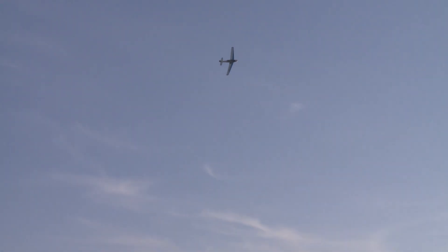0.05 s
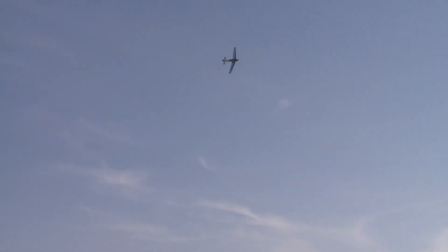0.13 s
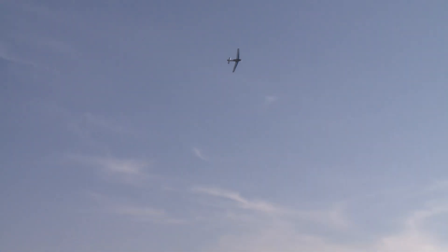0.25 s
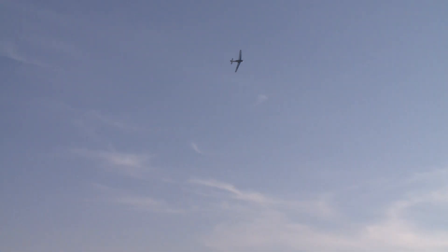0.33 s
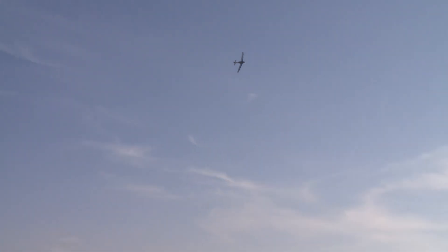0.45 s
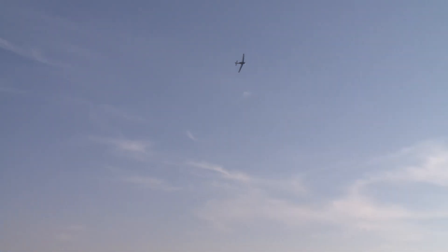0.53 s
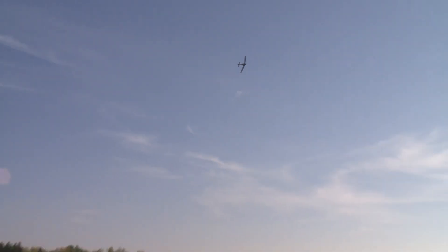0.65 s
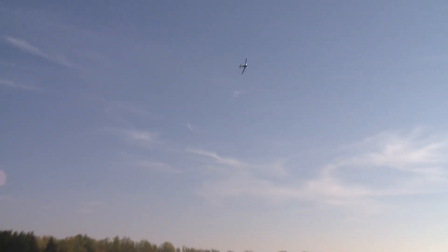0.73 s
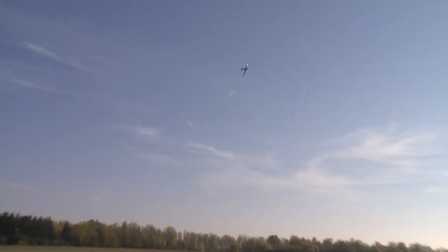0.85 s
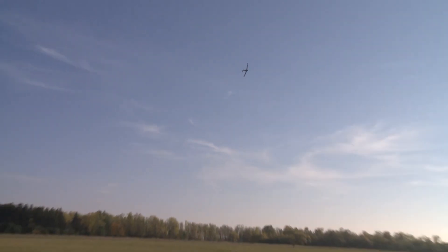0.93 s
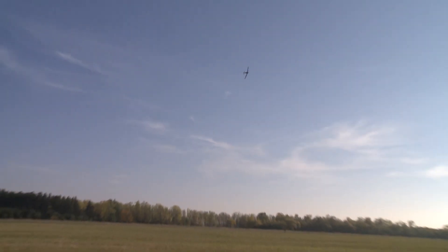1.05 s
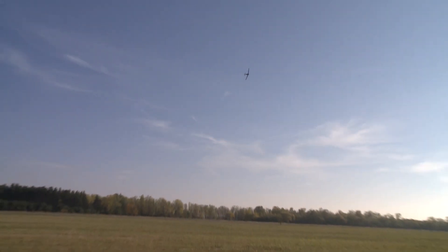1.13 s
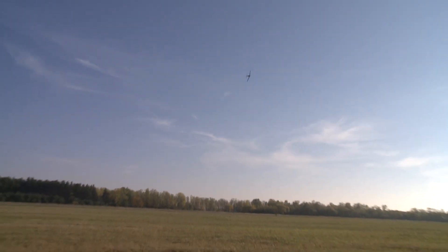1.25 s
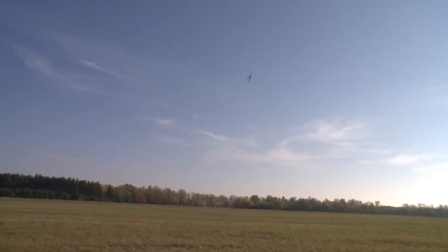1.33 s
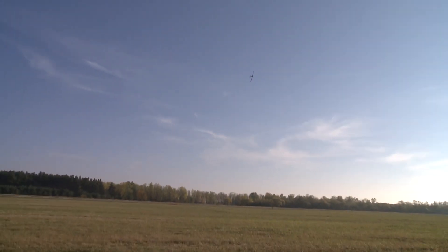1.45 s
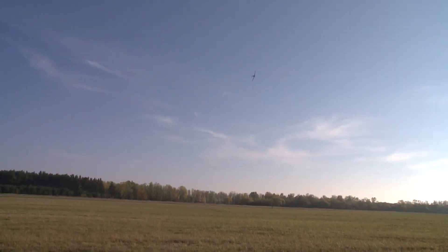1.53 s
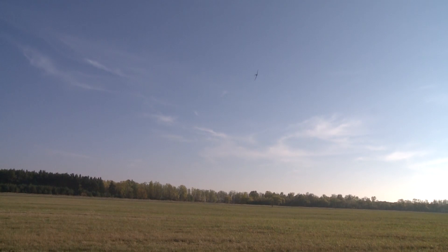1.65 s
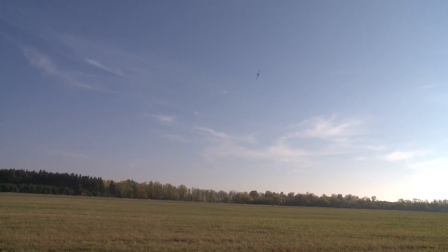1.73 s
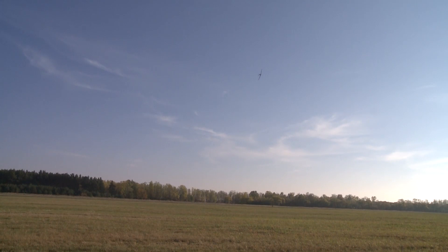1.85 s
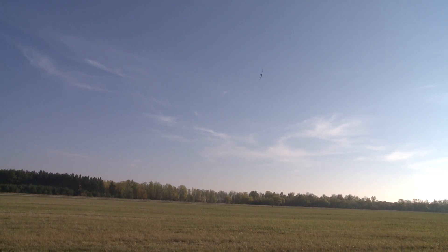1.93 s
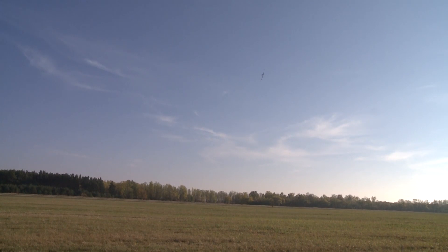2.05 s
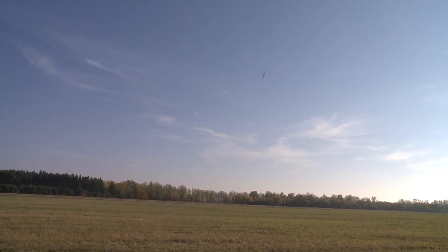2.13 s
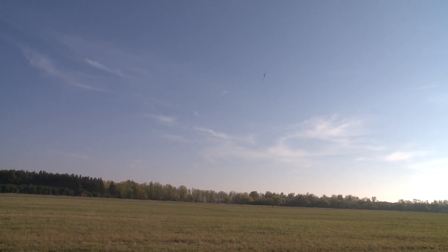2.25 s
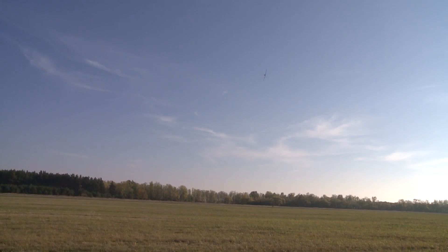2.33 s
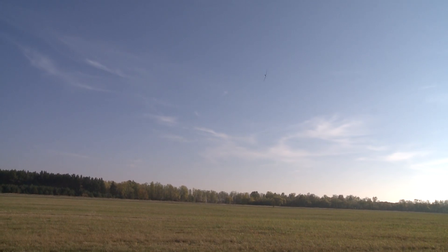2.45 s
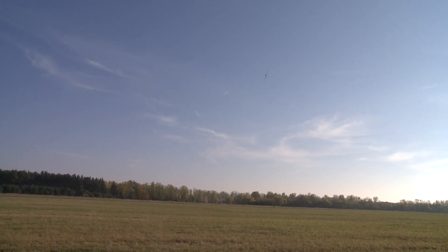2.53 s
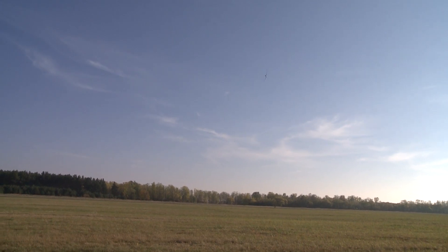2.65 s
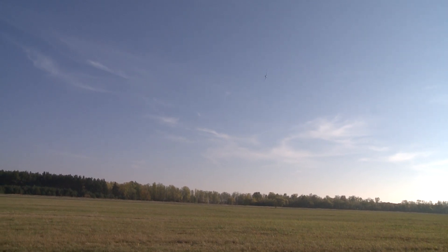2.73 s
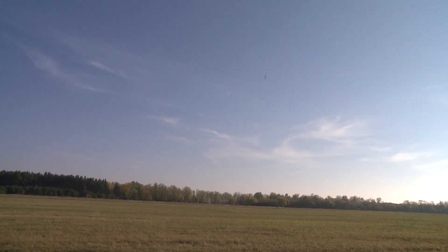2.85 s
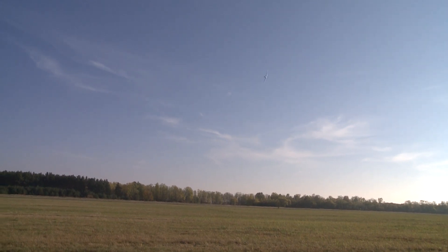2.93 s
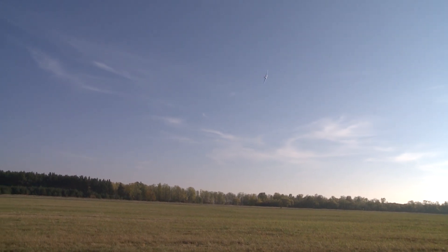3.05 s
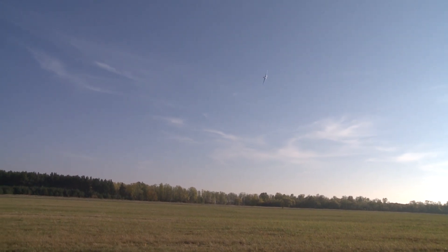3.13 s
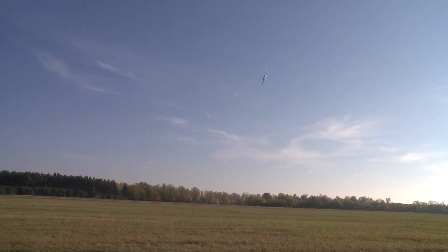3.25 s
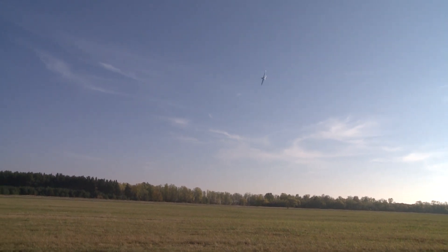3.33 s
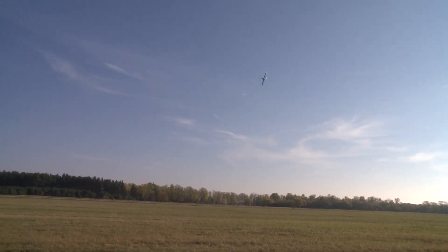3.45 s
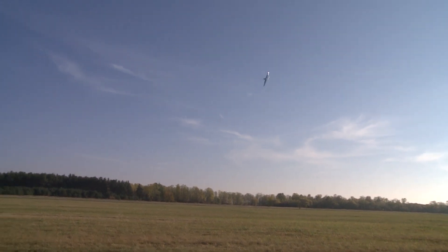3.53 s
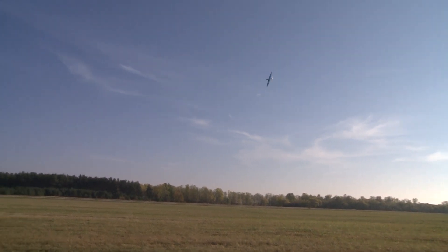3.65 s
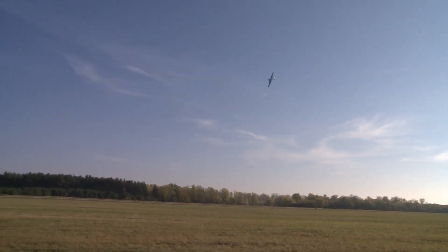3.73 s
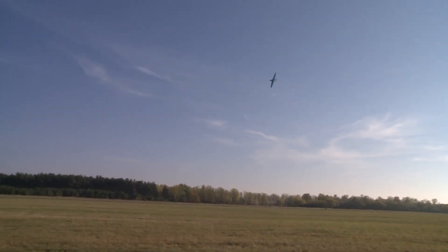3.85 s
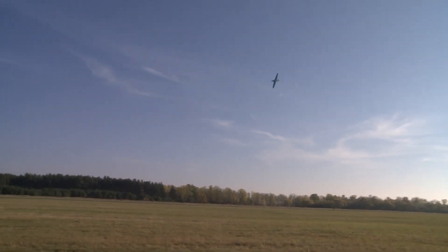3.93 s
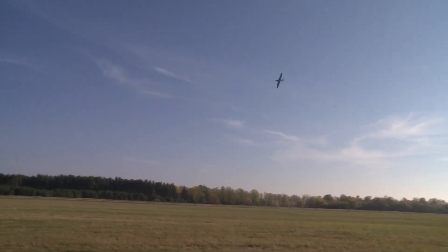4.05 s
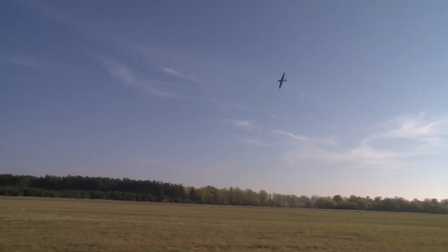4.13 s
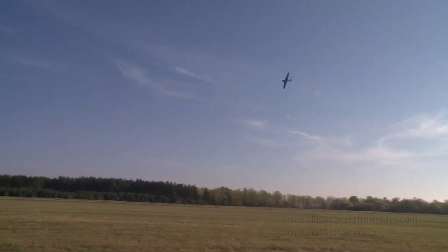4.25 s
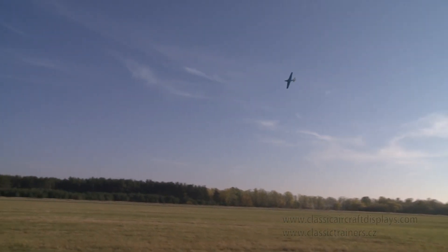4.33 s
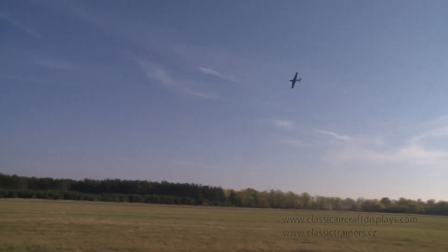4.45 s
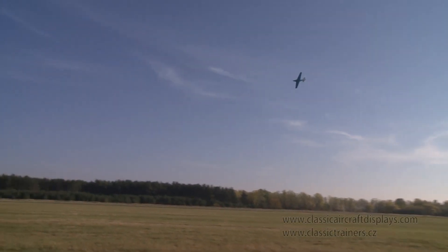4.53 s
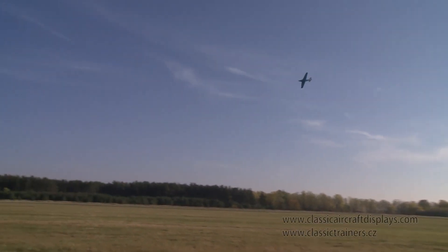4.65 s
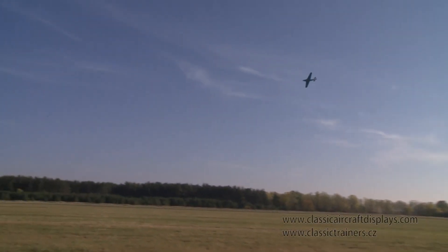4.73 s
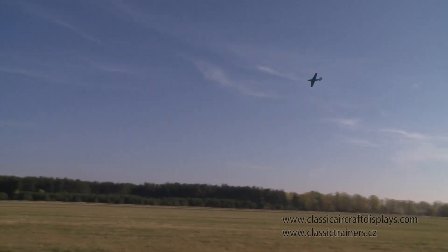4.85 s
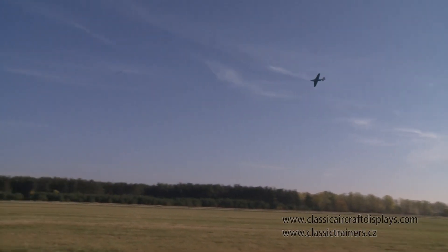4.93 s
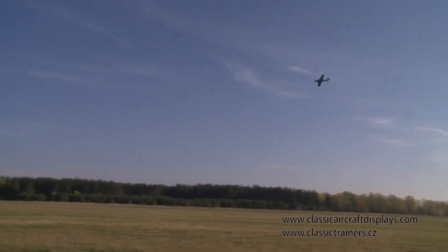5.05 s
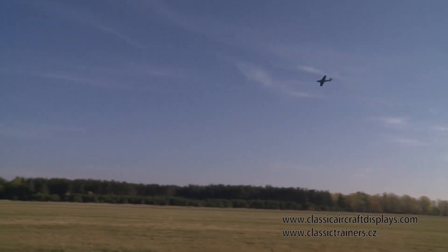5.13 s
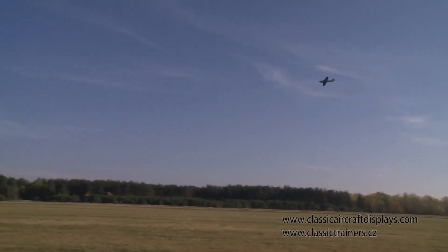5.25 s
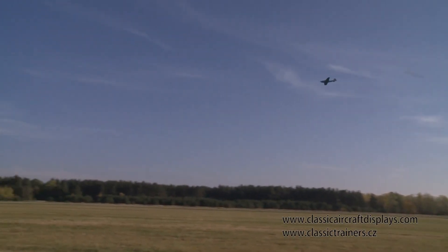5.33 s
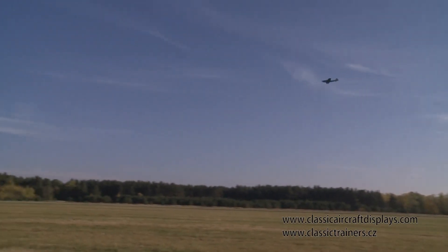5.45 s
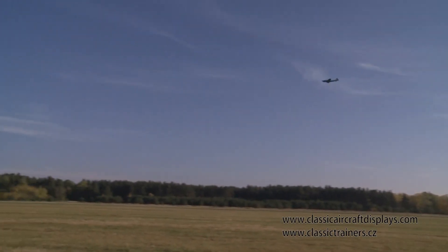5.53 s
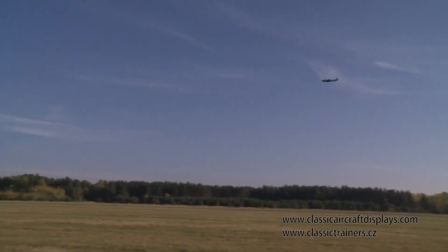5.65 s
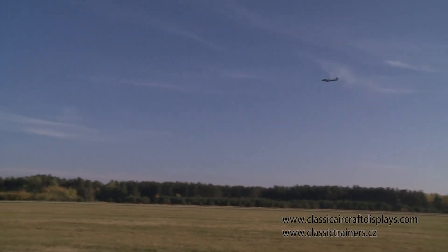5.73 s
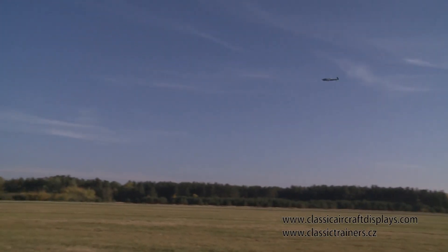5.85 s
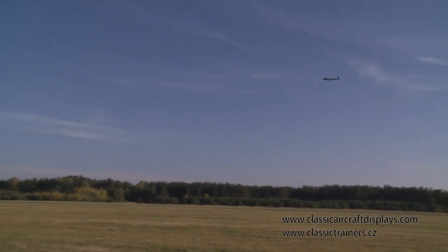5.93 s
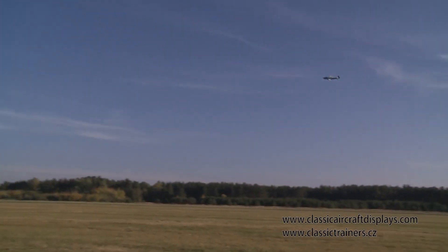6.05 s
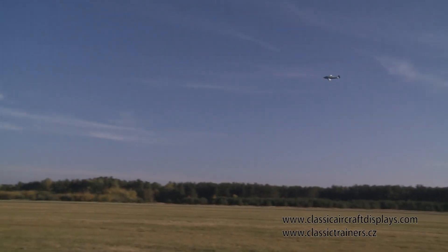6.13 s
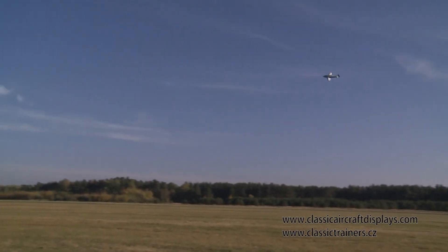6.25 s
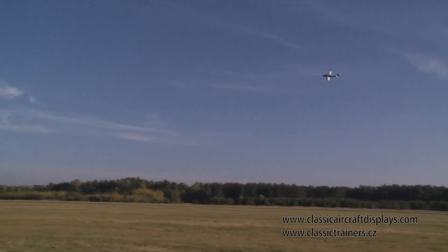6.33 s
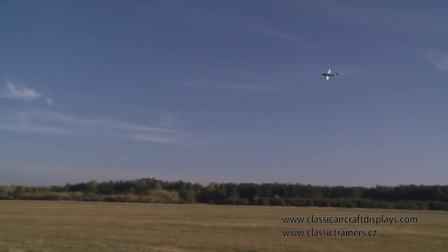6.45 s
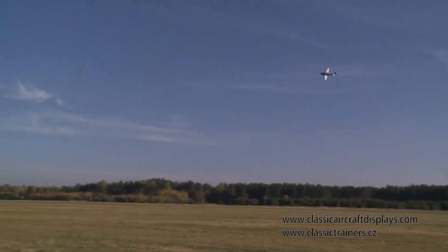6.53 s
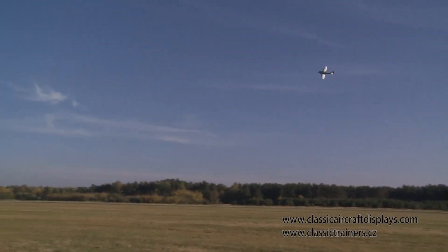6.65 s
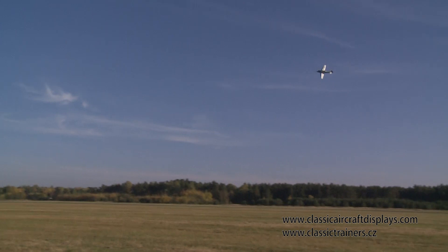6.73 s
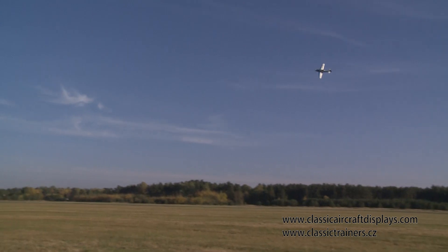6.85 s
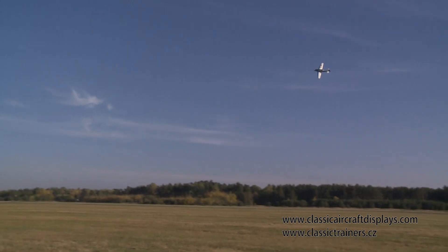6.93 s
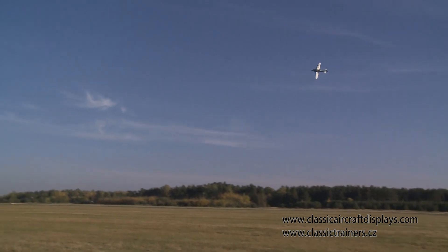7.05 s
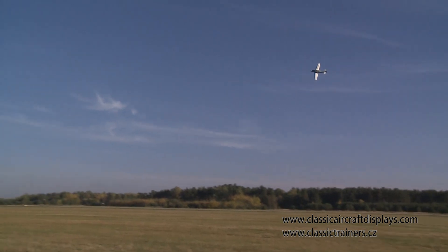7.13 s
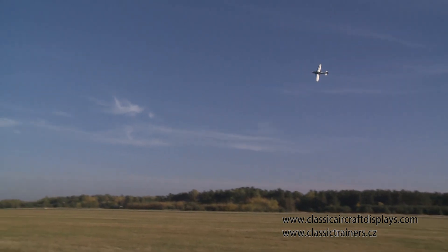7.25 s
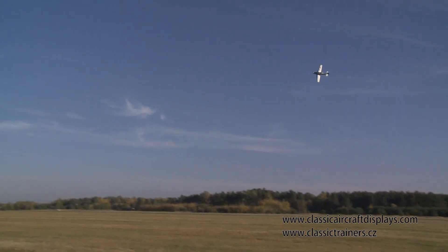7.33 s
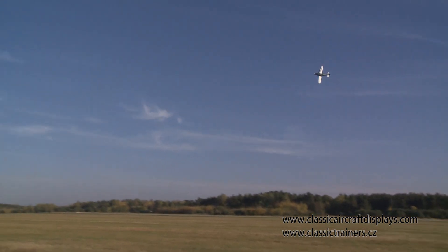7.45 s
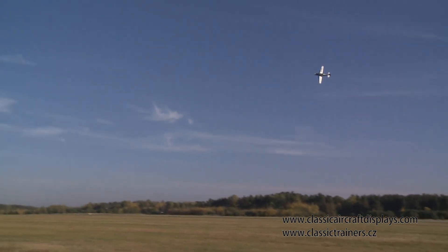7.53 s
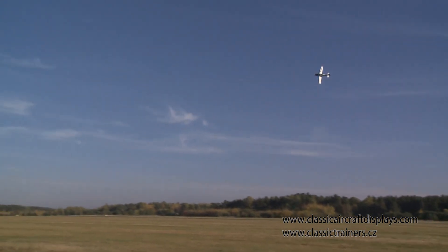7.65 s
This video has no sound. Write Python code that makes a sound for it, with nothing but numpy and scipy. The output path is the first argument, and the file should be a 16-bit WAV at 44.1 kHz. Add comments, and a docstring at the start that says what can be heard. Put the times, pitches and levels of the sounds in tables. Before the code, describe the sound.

Piston propeller plane drones over an open field, pitch rising then sliding down as it swings past with rasping, crackling exhaust; small motor whirs at first.

```python
"""Propeller plane over an airfield

A piston-engine plane turns above an open airfield and swings past, over breeze and far countryside.
Shaft-locked sines make the propeller and firing drone; each firing adds a rasping burst of pulses and noise.
An echo off the grass combs the body of the bursts, and a few firings crack louder than the rest.
A lens zoom motor whirs at first; the sources reach the right channel only, the left holds faint hiss."""
import sys
import numpy as np
from scipy import signal
from scipy.fft import rfft, irfft, next_fast_len
from scipy.io import wavfile
from scipy.ndimage import uniform_filter1d, map_coordinates

SR = 44100
rng = np.random.default_rng(int(sys.argv[2]) if len(sys.argv) > 2 else 0)


def bounce(signal):
    """Save signal as a 16-bit WAV file at the path given by the first command-line argument."""
    frames = np.transpose(np.atleast_2d(signal))
    limited = np.clip(frames, -1, 1)
    pcm = np.round(limited * 32767).astype(np.int16)
    wavfile.write(sys.argv[1], SR, pcm)


N = 339570
TIME = np.arange(N) / SR
# Source levels are mix levels, ahead of the microphone gain in scene().
FLANK_TURN_S = (3.77, 5.8)  # the plane swings from end-on to broadside


def from_db(db):
    """Decibels to amplitude."""
    return 10 ** (np.asarray(db) / 20)


def rms_one(x):
    """Scale a sound to rms 1."""
    return x / np.sqrt(np.mean(x ** 2) + 1e-20)


def in_time(rows):
    """Each column of a curve table at every sample."""
    s, *columns = np.transpose(rows)
    return [np.interp(TIME, s, c) for c in columns]


def humps(rows):
    """Sum of bell-shaped rises or dips; the half length reaches down to 1/e."""
    return sum(db * np.exp(-((TIME - s) / half_s) ** 2) for s, half_s, db in rows)


def drift(rate_hz):
    """Slow random wander of spread 1: noise through two equal low-pass poles at the given rate."""
    step = 40  # samples between drawn points
    pole = np.exp(-2 * step * np.pi * rate_hz / SR)
    noise = rng.standard_normal(N // step + 2002)
    slow = signal.lfilter([1], [1, -2 * pole, pole * pole], noise)[2000:]  # drop the filter's start-up
    return np.interp(np.arange(N) / step, np.arange(len(slow)), rms_one(slow))


def coloured(x, spectrum):
    """Shape a sound by (frequency [Hz], relative level [dB]) points; rms 1."""
    size = next_fast_len(N + SR // 4)
    hz, db = np.transpose(spectrum)
    bins_hz = np.maximum(np.arange(size // 2 + 1) * SR / size, 1)
    gain = from_db(np.interp(np.log(bins_hz), np.log(hz), db))
    return rms_one(irfft(rfft(x, size) * gain, size)[:N])


def band(x, low_hz, high_hz, order=4):
    """One band of a sound, without phase shift so that neighbours join smoothly; rms 1."""
    edges_hz = [low_hz, min(high_hz, .45 * SR)]
    return rms_one(signal.sosfiltfilt(signal.butter(order, edges_hz, "band", fs=SR, output="sos"), x))


def blend(a, b, share):
    """Two sounds mixed by power, the first taking the given share."""
    share = np.clip(share, 0, 1)
    return np.sqrt(share) * rms_one(a) + np.sqrt(1 - share) * rms_one(b)


def evened(x):
    """Hold the rms near 1 over a sliding quarter of a second."""
    return x / np.sqrt(uniform_filter1d(x ** 2, size=SR // 4) + 1e-12)


def flank():
    """How far the plane has turned its side to the listener, 0-1."""
    return np.interp(TIME, FLANK_TURN_S, [0, 1])


def channel_hiss():
    """Steady white noise, independent in each channel: faint on the left, a little stronger on the right."""
    return from_db([[-84.5], [-81]]) * rng.standard_normal((2, N))


def open_field():
    """Breeze and far countryside: steady noise weighted to the low end."""
    # colour of the field: (frequency [Hz], relative level [dB])
    field_colour = [(20, 5), (42, 10), (70, 8), (120, 8), (250, -5.5), (600, -25.5), (1500, -3.5),
                    (4000, -83)]
    return from_db(-56.0) * coloured(rng.standard_normal(N), field_colour)


def zoom_motor(whine_hz, step_hz, swing_hz):
    """A small lens motor: its whine swoops and pulses with the gear's turning, over a hiss of gears."""
    # motor running down to silence: (time [s], level [dB])
    motor_level = [(0, -74), (.95, -74.5), (1.2, -79), (1.42, -88), (1.6, -120)]
    # hiss of the gears: (frequency [Hz], relative level [dB])
    gear_colour = [(1500, -27), (2500, 6), (3300, 3), (4000, 0), (4600, -11), (5500, -10), (6500, -25.5)]
    level_db, = in_time(motor_level)
    gear = 2 * np.pi * step_hz * TIME + 0.16 * drift(6)
    swoop = np.sin(gear / 2) + np.sin(gear) + np.sin(3 * gear / 2) + np.sin(2 * gear)
    pitch_hz = whine_hz + swing_hz * swoop + 130 * drift(250)
    pulse = (1 + .5 * np.cos(gear)) * from_db(1.5 * drift(150))
    whine = np.sin(2 * np.pi * np.cumsum(pitch_hz) / SR) * pulse
    gears = from_db(-2) * coloured(rng.standard_normal(N), gear_colour)  # dB against the whine
    return from_db(level_db) * (band(whine, 3700, 4270, order=3) + gears)


def propeller_wash(growl_db):
    """Turbulent air behind the propeller: low noise whose level follows the growl."""
    # colour of the wash: (frequency [Hz], relative level [dB])
    wash_colour = [(30, -32), (90, 23), (170, 10), (300, 19.5), (420, 19), (600, -11), (900, -40.5)]
    return from_db(growl_db - 12.5) * coloured(rng.standard_normal(N), wash_colour)


def buzz_level():
    """Blade buzz in dB: it sinks as the plane turns away and returns as it swings past."""
    start_db, end_on_db, passing_db = -53.5, -68, -45.5
    sinks_s, returns_s = (.8, 1.8), (4.85, 5.4)
    buzz_db = np.interp(TIME, [*sinks_s, *returns_s], [start_db, end_on_db, end_on_db, passing_db])
    dulling_db = 0.1 * (buzz_db - passing_db)  # the upper overtones lose extra dB per dB of buzz
    return buzz_db, dulling_db


def propeller(turns):
    """Four blades geared to half the crank speed pass twice a crank turn, each with a slap and a swish."""
    # fundamental of the blade passes: (time [s], level [dB])
    blade_tone = [(0, -47.5), (1.651, -48), (2.2, -44.5), (2.9, -46.5), (3.95, -41), (4.899, -45.5),
                  (5.25, -40.5), (7.7, -35)]
    # slaps creep ahead of the firings as the plane rolls: (time [s], lead [crank turns])
    blade_lead = [(0, .01), (4.2, .01), (5.0, .045), (5.4, .085), (6.0, .135), (6.62, .208), (7.1, .29),
                  (7.7, .34)]
    # buzz: (multiple of the blade-pass rate [ratio], level against the buzz before dulling [dB])
    overtones = [(2, -1), (3, -6), (4, -1), (5, -1), (6, -8), (7, -11.5), (8, -11), (9, -10), (10, -9.5),
                 (11, -13), (12, -22), (13, -24)]
    # air dragged along by each blade: (frequency [Hz], relative level [dB])
    swish_colour = [(150, -29), (300, 4), (520, -0.5), (680, -2), (900, 1.5), (1200, -13), (2500, -44.5)]
    tone_db, = in_time(blade_tone)
    lead, = in_time(blade_lead)
    buzz_db, dulling_db = buzz_level()
    passes = 2 * np.pi * 2 * (turns + lead) + 0.025 * drift(3.5)
    buzz = 0
    for k, db in overtones:
        level_db = db + dulling_db * (k > 5) + 0.87 * drift(5.6)
        buzz = buzz + from_db(level_db) * np.cos(k * passes)
    swish_pulse = np.exp(8 * np.cos(passes))  # 8 sets the sharpness
    swish = from_db(-8.5) * coloured(rng.standard_normal(N) * swish_pulse, swish_colour)
    tone = np.sqrt(2) * from_db(tone_db + .3 * drift(5.6)) * np.cos(passes)
    return tone + from_db(buzz_db) * (np.sqrt(2) * buzz + swish)


def partial(turns, multiple, flutter_db, wander):
    """A sine of rms near 1 locked to a shaft; restless air shakes its level [dB] and phase [rad]."""
    phase = 2 * np.pi * multiple * turns + wander * drift(3.5)
    return np.sqrt(2) * np.sin(phase) * from_db(flutter_db * drift(5.1))


def engine_drone(turns, growl_db):
    """A bank fires three times a turn; unequal cylinders add lines whose balance shifts as the plane turns."""
    # firing tone: (time [s], level [dB])
    firing_tone = [(0, -41.5), (1.05, -39), (1.699, -43), (2.3, -40.5), (3.15, -40), (4.501, -32.5),
                   (6.1, -30.5), (6.4, -33), (6.7, -33), (7.3, -37.5), (7.7, -37.5)]
    # the octave fades and comes forward as the plane turns: (time [s], half length [s], change [dB])
    octave_fades = [(1.65, 0.56, -8.5), (2.65, 0.53, 2.5), (5.5, .35, -4)]
    # lines from unequal cylinders, multiples rounded to the nearest half below:
    # (multiple of crank speed [ratio], relative level end-on [dB], relative level broadside [dB])
    lope_lines = [(1, -19, -20), (1.5, -14.5, -19.5), (2.5, -19, -15.5), (3.5, -15.5, -10),
                  (4.5, -6.5, -13.5), (5, -14.5, -16), (5.5, -9, -15.5), (6.5, -9, -10), (7, -11.5, -14),
                  (7.5, -4.5, -5), (8, -8.5, -15), (8.5, -9.5, -13.5), (9, -10.5, -5.5), (9.5, -21.5, -17),
                  (10.5, -12, -14.5), (11.5, -20, -13), (12.5, -28, -19), (14.5, -18.5, -28.5),
                  (15, -15, -20), (16, -15.5, -21.5), (16.4, -17, -19), (17.5, -15, -20.5),
                  (18.5, -15, -24.5), (25.5, -16.5, -19.5)]
    tone_db, = in_time(firing_tone)
    # the octave rises 1.44 dB per dB of growl
    octave_db = -41 + 1.44 * (growl_db + 39.5) + humps(octave_fades)
    firings, side = 3 * turns, flank()
    tone = from_db(tone_db) * partial(firings, 1, flutter_db=0.5, wander=0.026)
    octave = from_db(octave_db) * partial(firings, 2, flutter_db=0.5, wander=0.12)
    lope = 0
    for k, end_db, side_db in lope_lines:
        line_turns = turns + 2 * rng.random()  # random starting phase
        line = partial(line_turns, round(2 * k) / 2, flutter_db=0.8, wander=0.03 * k)
        lope = lope + from_db(end_db + side * (side_db - end_db)) * line
    return tone + octave + from_db(growl_db - 4.5) * lope


def over_grass(x):
    """The ground returns a slightly later, duller copy."""
    # echo off the grass: (time [s], lag [ms], strength [0-1])
    ground_echo = [(0, 2.08, .35), (1.2, 2.244, 0.5), (2.5, 2.4, 0.26), (4.5, 2.384, 0.26),
                   (5.0, 2.295, 0.2), (5.6, 2.23, 0.18), (6.5, 2.046, 0.2), (7.5, 2.34, 0.47)]
    lag_ms, strength = in_time(ground_echo)
    dull = signal.sosfiltfilt(signal.butter(1, 8000, fs=SR, output="sos"), x)
    return x + strength * np.interp(TIME - lag_ms / 1000, TIME, dull)


def pops():
    """Now and then a firing cracks louder than the rest: one short ring of the pipe."""
    # sharper exhaust pops: (time [s], peak level before the echo [dB])
    pop_times = [(3.2632, -28.5), (4.1025, -26), (5.3875, -25.5), (5.4182, -27), (5.4803, -21),
                 (5.7632, -23), (6.797, -27)]
    clicks = np.zeros(N)
    for s, db in pop_times:
        clicks[int(s * SR)] = from_db(db)
    pipe = signal.butter(3, [1300, 2350], "band", fs=SR, output="sos")
    ring = signal.sosfilt(pipe, signal.unit_impulse(SR // 100))
    return over_grass(np.convolve(clicks, ring / np.abs(ring).max())[:N])


def bursts(turns, uneven_db):
    """Each valve in turn opens with a blast; its gas swells quickly, then falls. Gives (blasts, gas envelope)."""
    # six cylinders of the near bank in firing order: (relative level [dB])
    cylinder_levels = [-10.5, -9.5, -9.5, -7, -10, -6.8]
    # pipes of unequal length delay the blasts: (delay [share of the firing interval])
    pipe_delay = [.03, .10, .02, .07, .13, .05]
    firings = 3 * turns + .3 + 0.008 * drift(43) + .015 * drift(2)
    which, age = np.floor(firings).astype(int), firings % 1
    cylinder = which % len(cylinder_levels)
    levels_db = np.array([db + 1.2 * drift(4) for db in cylinder_levels])  # each strength wanders
    chance_db = uneven_db * rng.standard_normal(which.max() + 1)[which]
    strength = from_db(levels_db[cylinder, np.arange(N)] + chance_db)
    arrived = age > np.array(pipe_delay)[cylinder]
    blasts = np.diff(arrived.astype(int), prepend=1) > 0
    blowdown = age / .15 * np.exp(1 - age / .15)  # peaks at 0.15 of the firing interval
    return rms_one(blasts * strength), blowdown * strength


def smeared(blasts, ms_per_octave):
    """A blast leaves its pipe as a quick upward sweep with little bass in it."""
    low_hz = 627
    size = next_fast_len(N + SR // 4)
    hz = np.arange(size // 2 + 1) * SR / size
    delay_s = ms_per_octave / 1000 * np.log2(np.maximum(hz / low_hz, 1))
    gain = 1 - 1 / (1 + (hz / low_hz) ** 8)
    phase = -2j * np.pi * np.cumsum(delay_s) * SR / size  # delay summed over frequency
    return irfft(rfft(blasts, size) * gain * np.exp(phase), size)[:N]


def gas_noise(turns, envelope, repeat_share):
    """Rushing gas: partly the same in every two-turn engine cycle, partly fresh turbulence."""
    cycle = rng.standard_normal(SR // 24)
    same = map_coordinates(cycle, [turns / 2 % 1 * len(cycle)], order=3, mode="wrap")
    share = np.clip(repeat_share, 0, 1)
    return envelope * (np.sqrt(share) * same + np.sqrt(1 - share) * rng.standard_normal(N))


def radiated(gas):
    """The pipes point sideways, so their colour changes as the plane turns its flank to the listener."""
    # firing heard far off and end-on: (frequency [Hz], relative level [dB])
    end_on_colour = [(300, 1.5), (600, -6.5), (850, -4.5), (1020, -8.5), (1200, -1.5), (1430, -7.5),
                     (1750, -3.5), (1950, -7.5), (2200, -7), (2600, -10.5), (2900, -17.5), (3200, -41),
                     (3400, -37), (3700, -45.5), (4300, -45), (4650, -52.5), (5200, -39), (6600, -49.5),
                     (7300, -54.5), (9000, -67.5), (11500, -75.5)]
    # firing heard near and broadside: (frequency [Hz], relative level [dB])
    broadside_colour = [(300, -1.5), (450, -1.5), (600, -8.5), (860, -10), (1270, -15), (1500, -9.5),
                        (1950, -9.5), (2130, -13.5), (2300, -10), (2520, -22), (2850, -22), (3450, -22.5),
                        (3620, -25), (3850, -20), (4500, -31.5), (5100, -41.5), (5450, -30.5), (6100, -27),
                        (6700, -36.5), (7900, -35), (8900, -56), (11500, -75)]
    return (1 - flank()) * coloured(gas, end_on_colour) + flank() * coloured(gas, broadside_colour)


def bright_edge(x, half_width_hz):
    """Lift or dip a narrow band whose centre wanders, by shifting it to 0 Hz, filtering and shifting back."""
    # bright edge in the rasp: (time [s], centre [Hz], lift [dB])
    rasp_edge = [(0, 2470, 3.5), (.8, 2450, 8.5), (1.28, 2315, 6.5), (1.7, 2240, 0), (2.5, 2330, 5.5),
                 (3.2, 2270, 4), (4.2, 2220, 0), (4.75, 2270, 6.5), (5.25, 2040, 0.5), (5.87, 1960, 6.5),
                 (6.2, 1990, 0.5), (6.43, 2004, 7), (6.7, 1900, -1), (7.2, 2030, 0), (7.6, 2240, 3)]
    centre_hz, lift_db = in_time(rasp_edge)
    carrier = np.exp(2j * np.pi * np.cumsum(centre_hz) / SR)
    near = signal.sosfiltfilt(signal.butter(2, half_width_hz, fs=SR, output="sos"), x / carrier)
    return x + (from_db(lift_db) - 1) * 2 * np.real(near * carrier)


def exhaust_levels():
    """Bark, rasp, crackle, sizzle and air in dB: all follow the rasp and swell and sink with restless air."""
    # rasp as the pipes turn to and from the listener, before swells: (time [s], level [dB])
    rasp_level = [(0.0, -64.5), (0.7, -65.5), (0.83, -60.5), (1.32, -56), (1.62, -62.5), (1.84, -57.5),
                  (2.97, -54.5), (3.12, -48), (3.25, -45.5), (3.9, -41.5), (4.04, -46), (4.67, -42.5),
                  (5.07, -46), (5.49, -42), (6.32, -45.5), (7.11, -48), (7.7, -47.5)]
    # brief bright swells: (time [s], half length [s], change in the sizzle [dB])
    swells = [(.34, 0.059, 10), (.86, 0.074, 10), (.95, .03, 2.5), (1.18, 0.046, 9), (1.3, 0.048, 0.5),
              (1.85, .05, 4), (2.22, 0.058, 7.5), (2.53, 0.046, 2), (4.36, 0.064, 8.5), (4.58, 0.032, 5.5),
              (4.66, 0.028, 6.5), (4.81, 0.037, 6), (5.05, 0.092, 5.5), (5.19, 0.07, 7.5), (5.3, 0.064, 6),
              (5.395, 0.06, 9.5), (5.535, 0.024, 7.5), (5.6, 0.048, 7.5), (5.8, 0.098, 2), (5.97, 0.11, 6),
              (6.14, 0.026, 7.5), (6.21, 0.077, 12), (6.33, 0.04, 2.5), (6.45, 0.075, 7.5),
              (6.57, 0.038, 4), (6.72, 0.084, 4.5), (6.82, 0.061, 4.5), (6.895, 0.032, 7.5),
              (7.16, 0.084, 7), (7.53, 0.078, 2), (7.68, 0.064, 5.5)]
    # lulls between the swells, a few of them slight rises: (time [s], half length [s], change in the sizzle [dB])
    lulls = [(4.18, 0.045, 1), (4.5, .03, -1), (4.74, .025, -3.5), (4.92, 0.043, -2), (5.12, .02, -3.5),
             (5.475, 0.017, 1), (6.07, .035, 0.5), (6.635, 0.027, -3.5), (7.0, 0.041, -3),
             (7.3, 0.053, -2.5)]
    treble_opens_s = (2.1, 3.37, 5.06)  # the pipes come into view
    rasp_db, = in_time(rasp_level)
    shimmer_db = 1.3 * drift(15)
    swell_db = humps(swells) + humps(lulls) + shimmer_db
    # offsets at each stage of the opening; the higher the band, the more it takes of each swell
    bark_db = -43.5 + 0.89 * (rasp_db + 43)  # less steep than the rasp
    crackle_db = rasp_db + np.interp(TIME, treble_opens_s, (-21, -22.5, -12))
    sizzle_db = rasp_db + np.interp(TIME, treble_opens_s, (-40.5, -33.5, -24.5))
    air_db = sizzle_db + np.interp(TIME, FLANK_TURN_S, (-35, -30))
    return (bark_db + 0.3 * swell_db,
            rasp_db + 0.45 * swell_db,
            crackle_db + 0.74 * swell_db,
            sizzle_db + swell_db,
            air_db + 1.7 * swell_db)


def exhaust(turns, growl_db, bark_db, rasp_db, crackle_db, sizzle_db, air_db):
    """Bursts coloured by the pipes: the body lingers between firings and echoes, the edge falls off further."""
    blasts, puffs = bursts(turns, uneven_db=.7)
    # the added constants keep some gas rushing between firings
    body_gas = gas_noise(turns, puffs + .3, repeat_share=.24)
    gas = blend(smeared(blasts, ms_per_octave=.9), body_gas, share=.25)
    body = bright_edge(radiated(over_grass(gas)), half_width_hz=71)
    edge_gas = gas_noise(turns, puffs + .12, repeat_share=.25)
    edge = radiated(blend(blasts, edge_gas, share=.12))
    growl = from_db(growl_db - 8.5) * evened(band(body, 240, 800, order=3))
    bark = from_db(bark_db) * evened(band(body, 655, 1306, order=3))
    rasp = from_db(rasp_db) * evened(band(body, 1388, 2890, order=6))
    crackle = from_db(crackle_db) * evened(band(blend(body, edge, share=0.58), 3020, 4695, order=6))
    sizzle = from_db(sizzle_db) * evened(band(edge, 4020, 10000, order=4))
    air = from_db(air_db) * evened(band(edge, 8800, 12000, order=4))
    return growl + bark + rasp + crackle + sizzle + air


def scene():
    """Plane, field and lens motor reach the right channel; both channels hiss."""
    # crankshaft as heard, Doppler shift included: (time [s], speed [turns/s])
    crank_speed = [(0.0, 40.2), (0.88, 42.0), (2.64, 46.17), (3.15, 47.17), (3.7, 47.76), (4.1, 47.55),
                   (4.4, 46.89), (4.84, 45.6), (5.28, 43.7), (5.72, 42.12), (6.55, 39.98), (7.04, 39.36),
                   (7.7, 38.99)]
    # low growl grows as the plane comes near; drone, exhaust and wash follow it: (time [s], reference level [dB])
    growl_level = [(0, -54.5), (1, -51.5), (1.901, -50.5), (3.101, -46), (4.5, -38), (5.15, -39.5),
                   (6.101, -38.5), (6.4, -43.5), (7.7, -44)]
    speed, = in_time(crank_speed)
    growl_db, = in_time(growl_level)
    turns = np.cumsum(speed) / SR
    background = open_field() + zoom_motor(whine_hz=4050, step_hz=63.3, swing_hz=54.7)
    plane = propeller_wash(growl_db) + propeller(turns) + engine_drone(turns, growl_db)
    plane = plane + pops() + exhaust(turns, growl_db, *exhaust_levels())
    microphone = 2 * (background + plane)
    fade_in = np.minimum(TIME / .006, 1)
    return fade_in * microphone * [[0], [1]] + channel_hiss()


def record(dry):
    """A steep low-pass cuts the top above 12 kHz."""
    return signal.sosfilt(signal.ellip(10, .1, 80, 12000, fs=SR, output="sos"), dry)


dry = scene()
out = record(dry)
bounce(out)
```